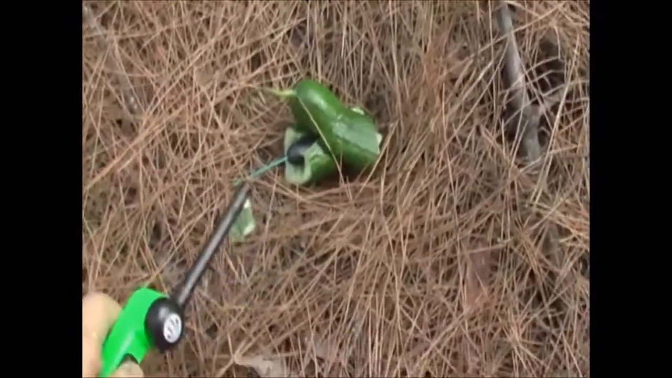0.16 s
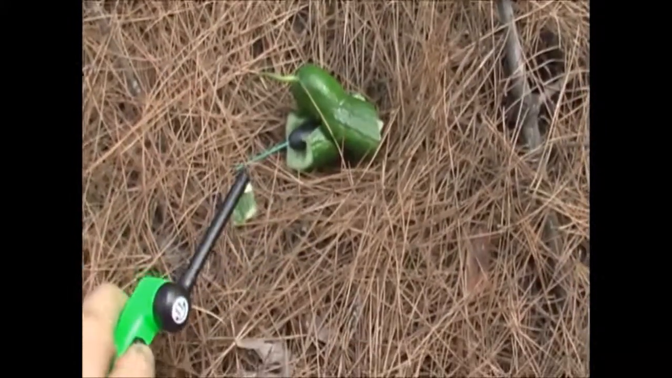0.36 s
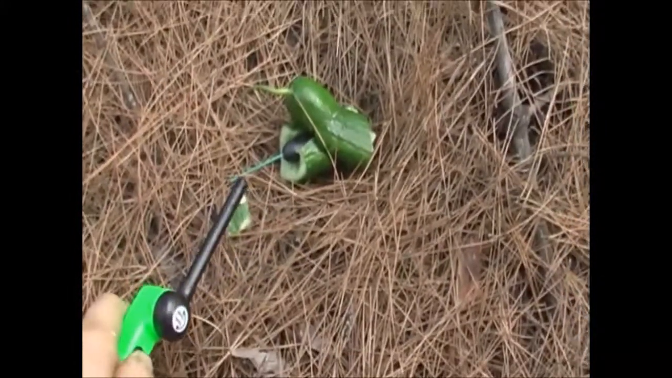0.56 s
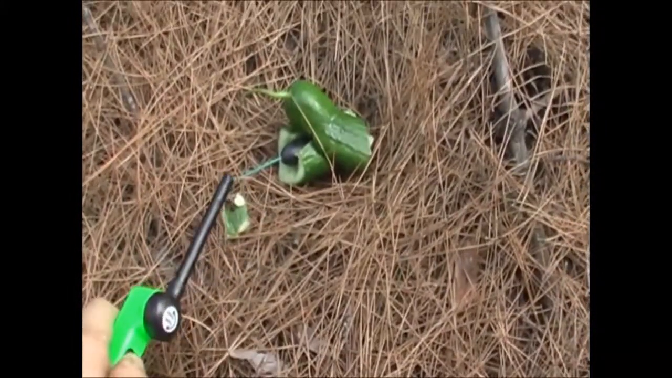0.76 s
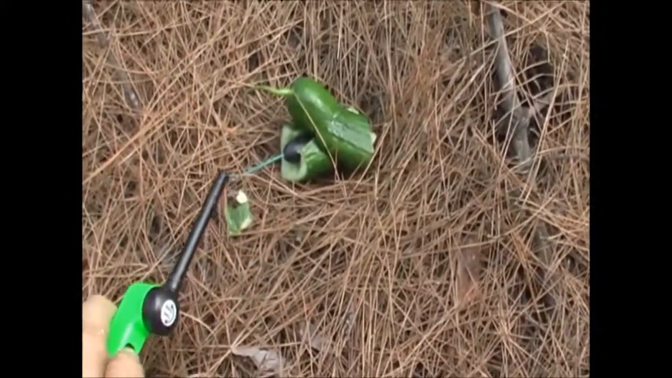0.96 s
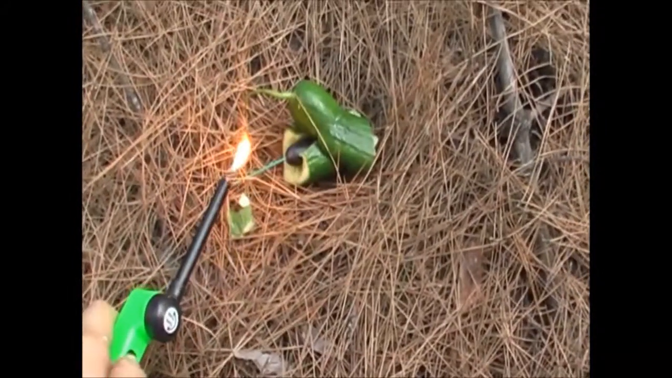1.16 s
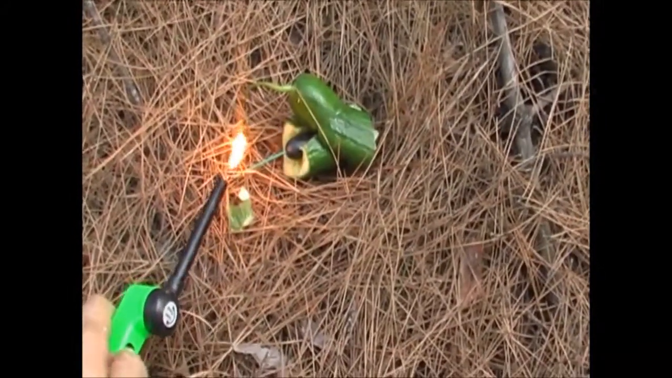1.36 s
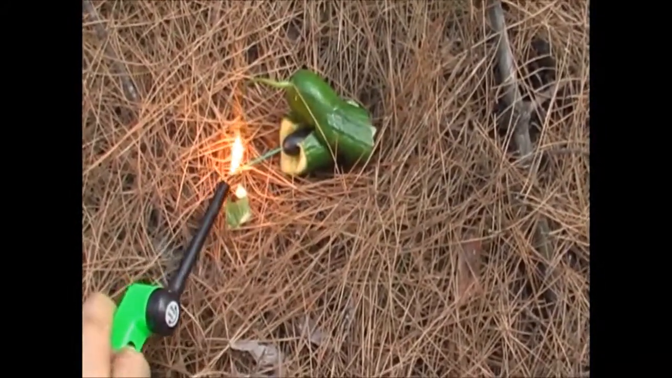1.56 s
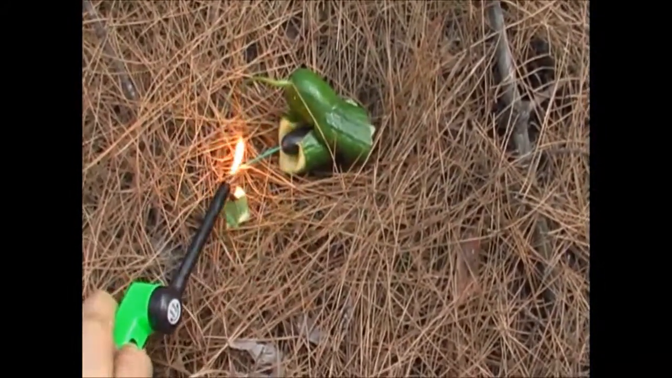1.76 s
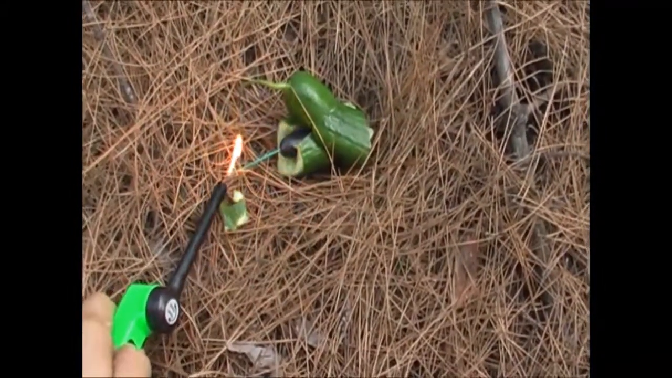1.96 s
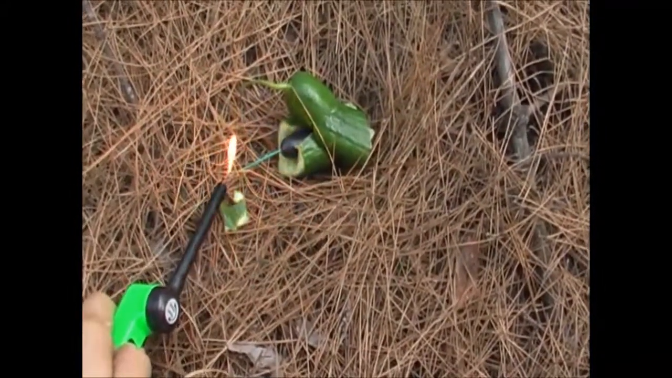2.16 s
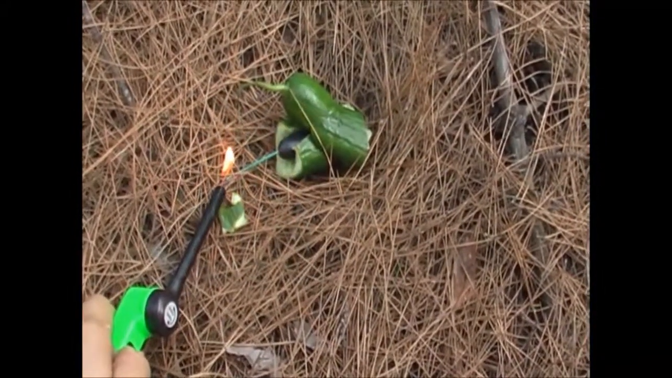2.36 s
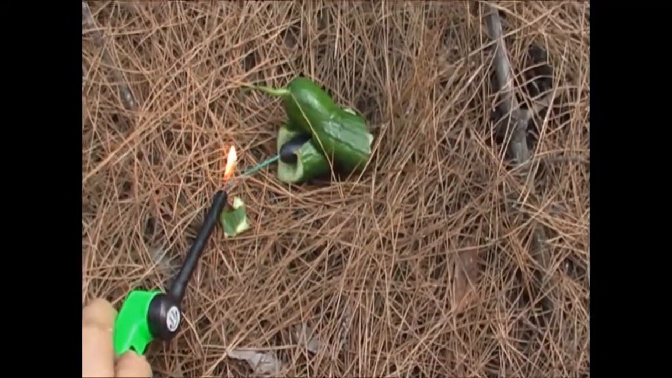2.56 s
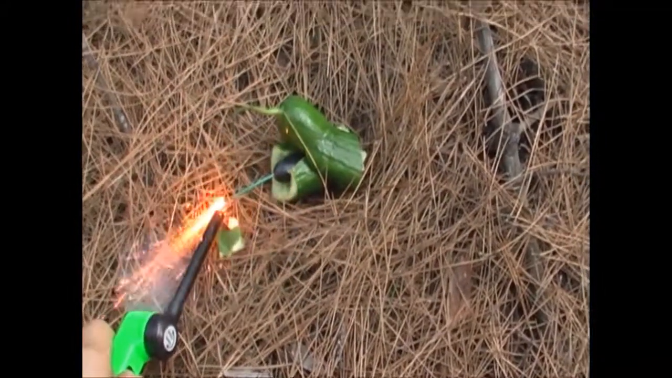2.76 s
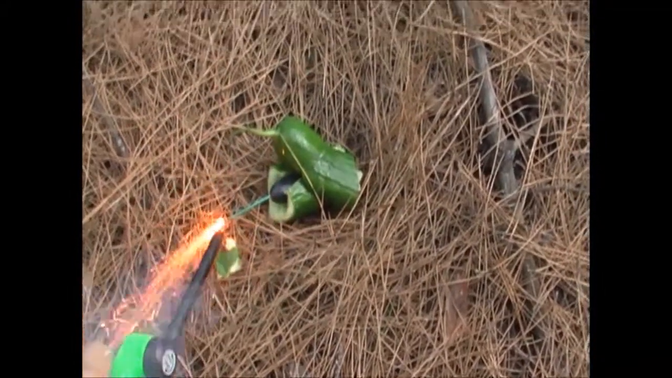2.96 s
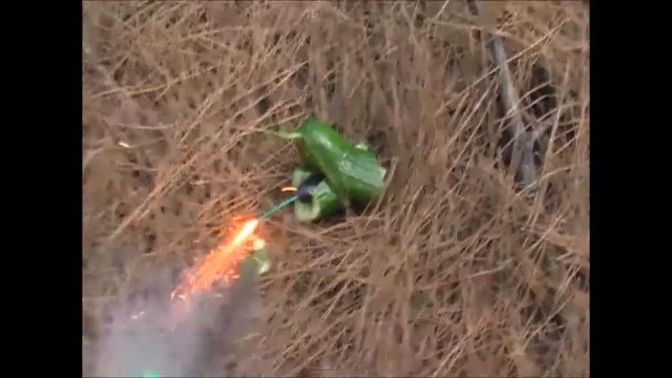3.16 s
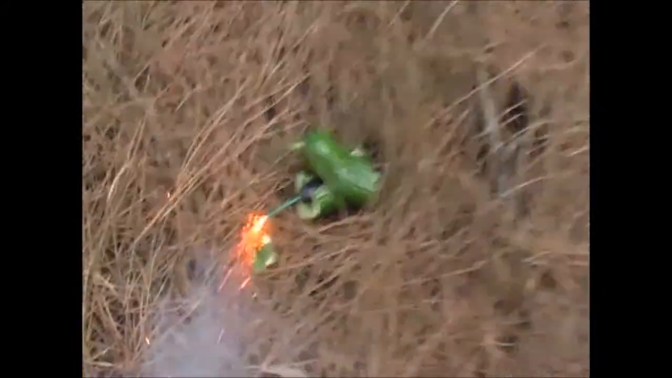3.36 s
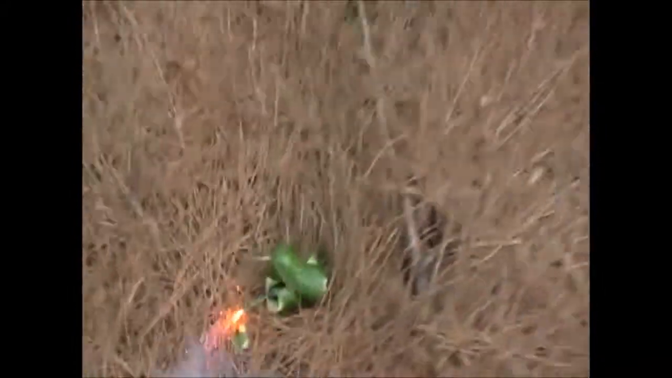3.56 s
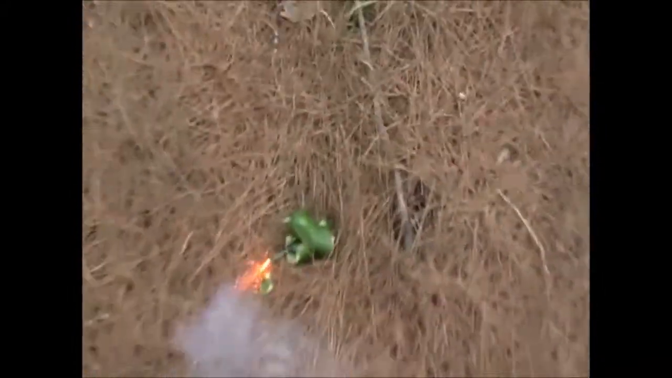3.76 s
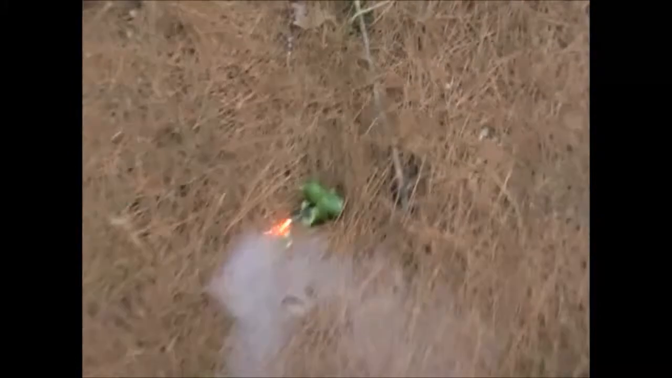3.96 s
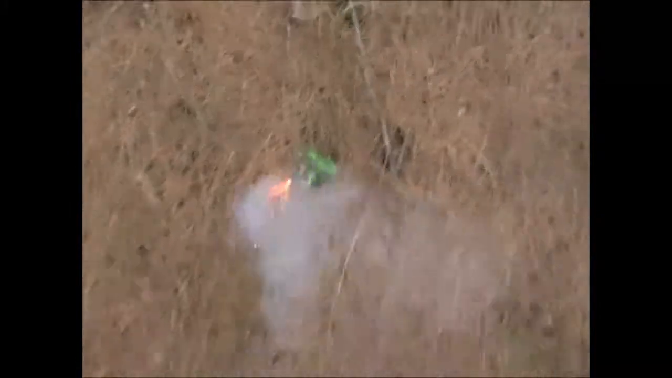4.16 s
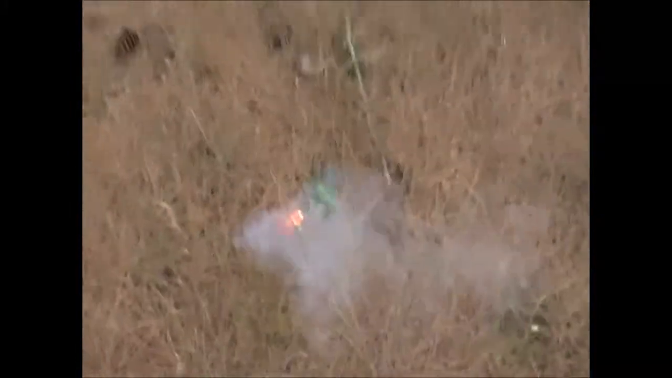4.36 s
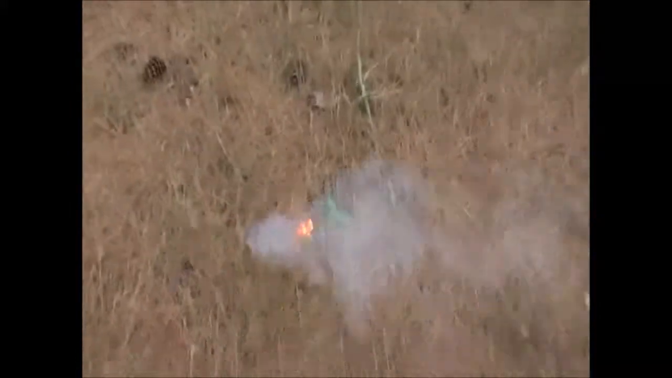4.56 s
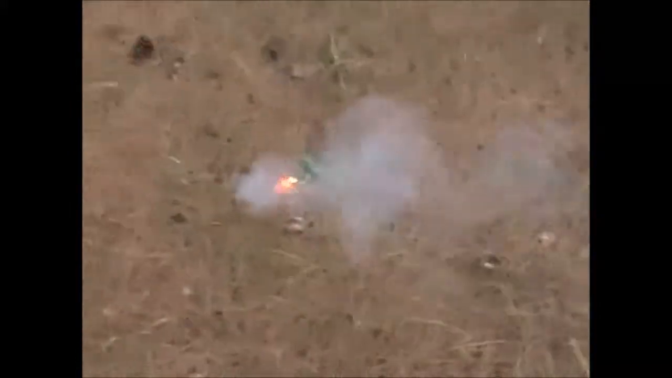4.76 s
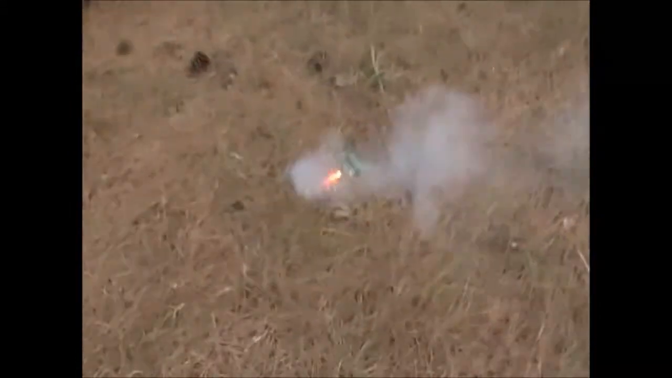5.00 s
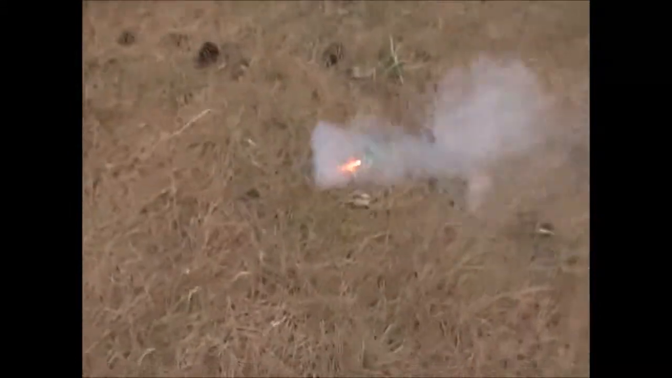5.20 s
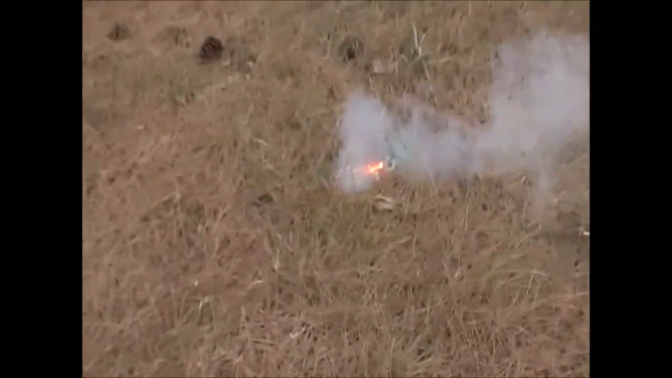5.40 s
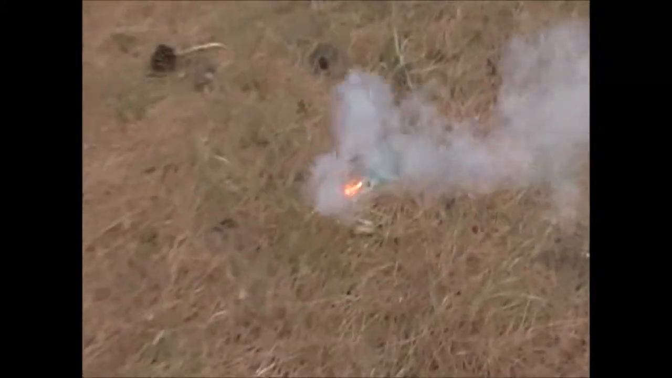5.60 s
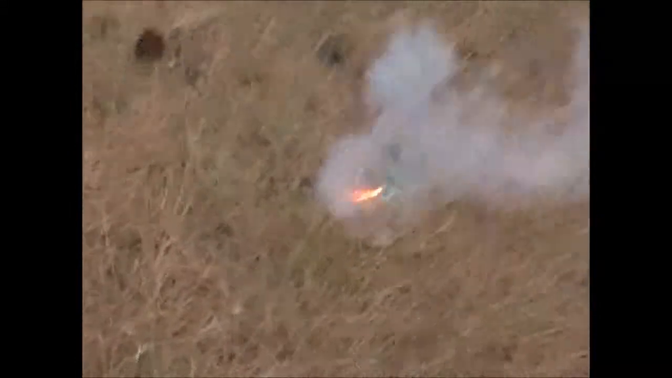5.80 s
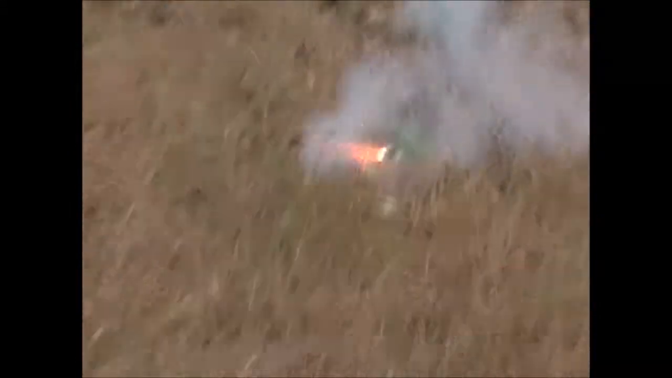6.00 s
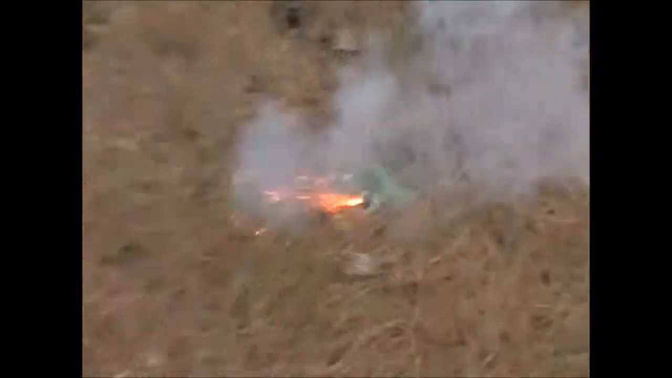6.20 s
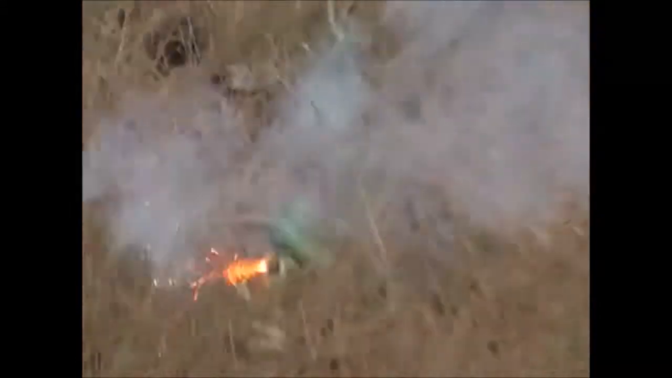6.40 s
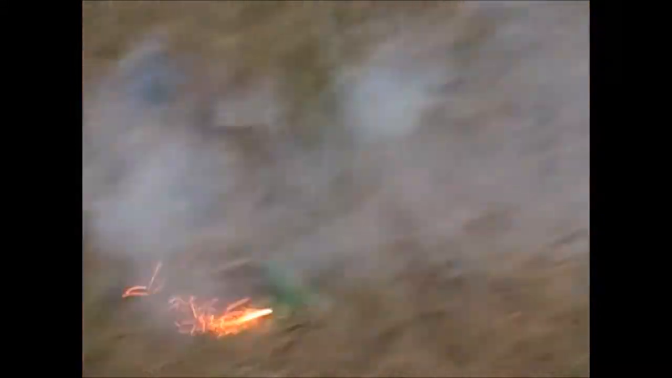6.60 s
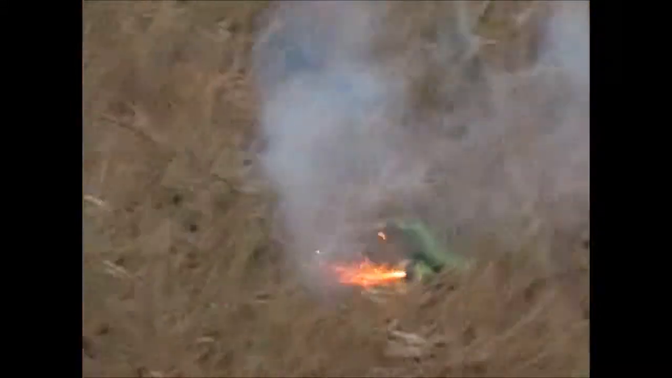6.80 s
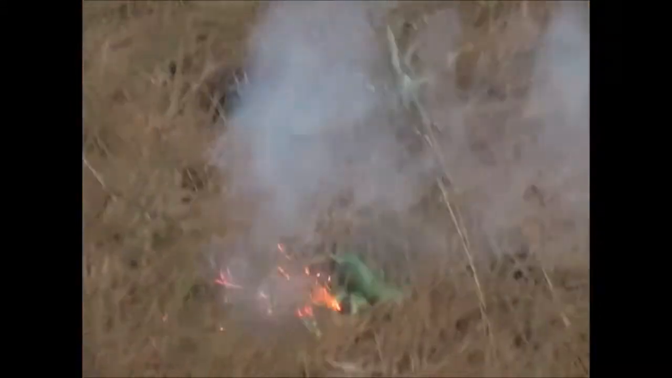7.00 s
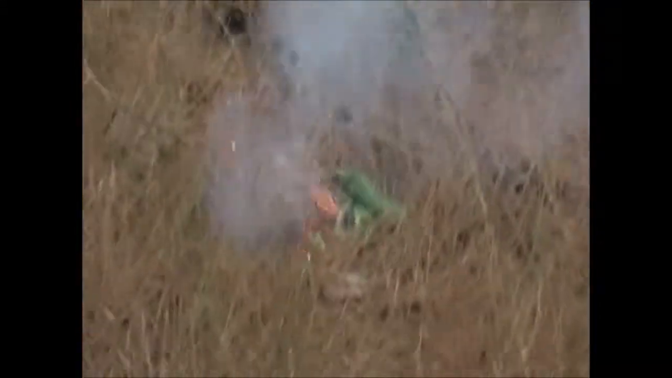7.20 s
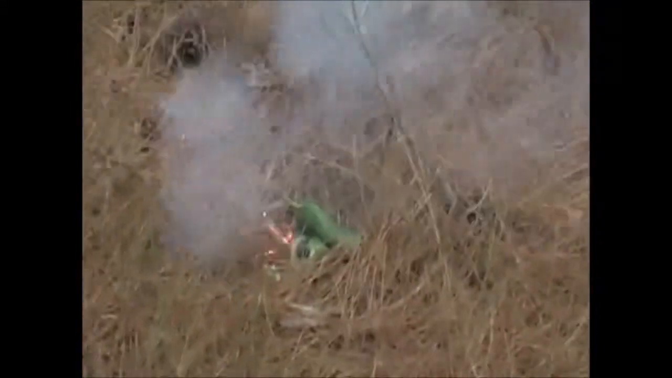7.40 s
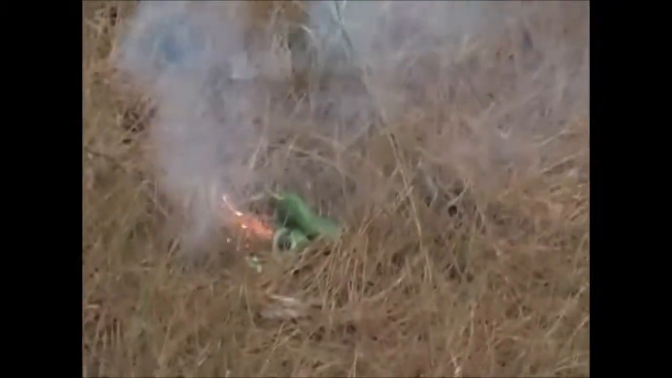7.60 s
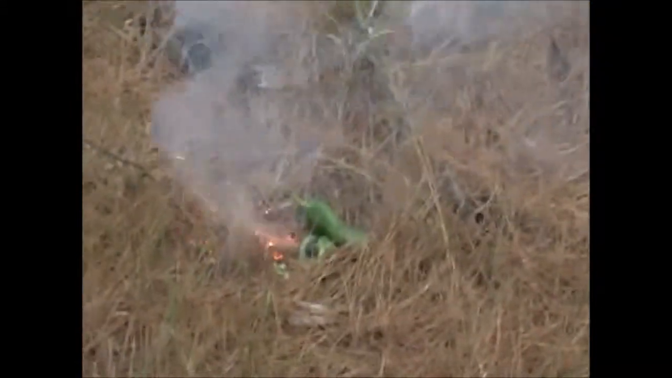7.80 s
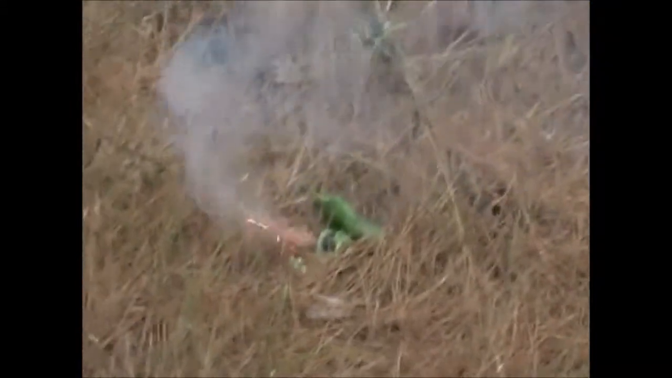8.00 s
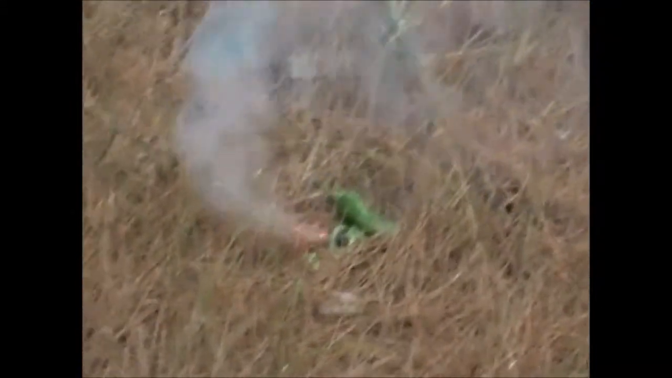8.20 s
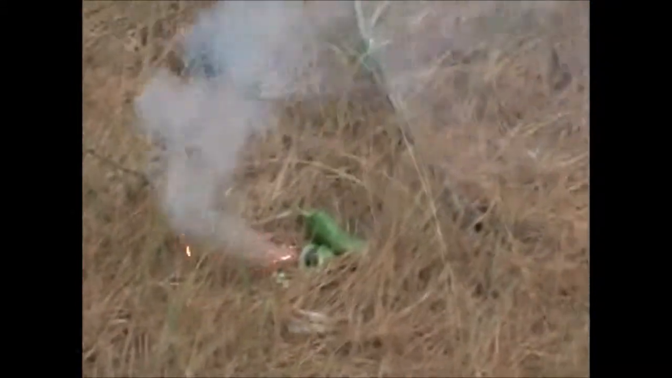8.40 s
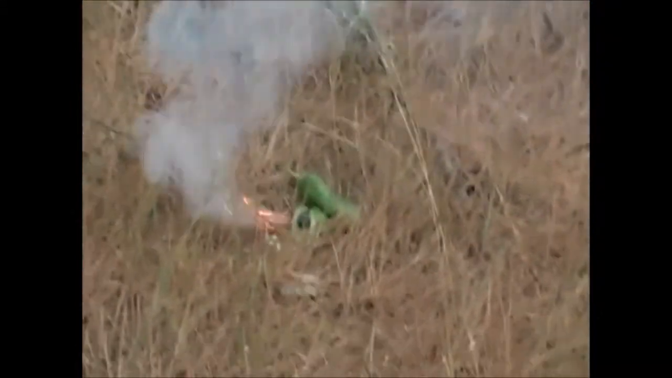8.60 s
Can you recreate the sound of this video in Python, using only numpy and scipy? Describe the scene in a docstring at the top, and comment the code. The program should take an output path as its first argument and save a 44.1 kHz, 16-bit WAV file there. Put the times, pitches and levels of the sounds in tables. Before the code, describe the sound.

Sharp plastic lighter clicks outdoors, a fuse catching with a fierce close hiss, crunching steps backing off, and a thin fizz inside the tube.

```python
"""Outdoors on dry pine needles: a long-necked lighter is snapped three times to light a firecracker's fuse.
The fuse flares into a hissing, sputtering jet, made of shaped noise and sparse clicks, heard from near by.
The listener backs away with crunching steps and cracking twigs, made of short, dying noise bursts.
The flame creeps into the tube and the jet turns to a hollow fizz over a low rumble, a hum and soft gusts."""
import sys
import numpy as np
from scipy import signal
from scipy.fft import rfft, irfft
from scipy.io import wavfile
from scipy.ndimage import uniform_filter1d

SR = 44100
rng = np.random.default_rng(int(sys.argv[2]) if len(sys.argv) > 2 else 0)


def inscribe(sig):
    """Save sig as 16-bit PCM at rate SR to the path in sys.argv[1].

    A 1-D sig is mono; a 2-D sig holds one channel per row.
    Samples are clipped to [-1, 1] before scaling.
    """
    pcm = np.round(np.clip(np.atleast_2d(sig).T, -1, 1) * 32767)
    wavfile.write(sys.argv[1], SR, pcm.astype(np.int16))


N = 381465  # length in samples
TIME = np.arange(N) / SR
BINS = np.fft.rfftfreq(1024, 1 / SR)  # frequencies of a spectrum, Hz
FRAMES = np.arange(N // 256 + 5) * 256 / SR  # times of the short spectra, s

# colour of a small tick of the lighter's parts: f/Hz, level/dB per Hz
TICK_COLOUR = [(100, -9), (600, -7), (1300, -1), (2300, -7), (3000, 0), (4400, -3.5), (5700, -13.5),
               (7400, -13), (9500, -16), (11000, -21.5), (14000, -23.5), (16000, -30.5)]

# the fuse catches and flares up
CATCH_S, FLARE_S = 2.792, 0.075
# the listener starts to back away from the fuse
BACK_OFF_S = 3.12
# the flame nears the tube's mouth, then slips inside
AT_MOUTH_S, INSIDE_S, SLIP_IN_S = 6, 7.13, 0.04


def fuse(flutter_db=0.74, patchy_db=1.3, roar_flutter_db=1.08, sparks_db=-13, tube_sparks_db=5):
    """A turbulent jet of burning powder makes rough noise, with sparks popping in it."""
    # colour of the jet close by, a few steps away and inside the tube: f/Hz, level/dB per Hz
    jet_near = [(50, -16), (220, -3.5), (500, -11), (850, 0), (1700, -0.5), (2350, -10), (2850, -1.5),
                (6000, -9.5), (7400, -4.5), (9300, -12), (10600, -2.5), (11800, -9), (13200, 1.5),
                (15000, -10)]
    jet_far = [(50, -23), (220, -9), (500, -8), (1000, 0), (1650, -1), (2100, -6.5), (3100, 0), (4400, 1.5),
               (5800, -2.5), (7900, 3), (9600, -4), (11300, -0.5), (13500, 1), (15500, 0.5)]
    jet_tube = [(50, -39), (300, 17), (700, -29), (1200, -14), (1600, 7), (2200, -2), (3200, 12),
                (4400, -2), (5900, -18), (7300, -17), (8400, -5), (9500, -6), (10800, -1), (15500, -25)]
    # how the tube's mouth colours the jet at full strength: f/Hz, width/Hz, level/dB
    tube_peaks = [(1200, 190, -29), (4170, 220, 19), (4300, 160, -5), (4880, 410, 23.5), (7260, 300, 22),
                  (8450, 240, 9)]
    # how alike left and right are: f/Hz, correlation
    jet_likeness = [(100, 0.98), (600, 1), (1400, 0.98), (2200, 1), (3500, 0.91), (5500, 0.92),
                    (7500, 0.95), (10500, 1), (13000, 0.87), (15500, 0.92)]

    # blend the three colours
    stage = jet_stage(FRAMES)[:, None]
    colours = enumerate((jet_near, jet_far, jet_tube))
    jet = sum(np.maximum(1 - abs(stage - k), 0) * unit(colour) for k, colour in colours)
    jet = jet + np.maximum(stage - 1, 0) * bumps(tube_peaks, BINS)

    # as the vent changes shape the jet leans towards a roar or a thin sizzle
    roar_db, hiss_db, sizzle_db = burn(FRAMES[:, None])
    roar_band, hiss_band, sizzle_band = (600, 1800), (2700, 9000), (11000, 15500)  # Hz
    jet = jet - band_db(jet, hiss_band)
    low = read([(1500, 1), (3200, 0)], BINS)
    high = read([(8000, 0), (12000, 1)], BINS)
    roar_lift = roar_db - hiss_db - band_db(jet, roar_band)
    sizzle_lift = sizzle_db - hiss_db - band_db(jet, sizzle_band)
    jet = jet + low * roar_lift + high * sizzle_lift
    # a small jet radiates little of the deepest bass
    jet = jet + read([(60, -7), (200, 2), (500, 3.5), (1200, -3.0), (3000, -0.5)], BINS)

    # uneven powder makes the whole jet flutter, eddies colour it in patches
    jet = jet + flutter_db * lumps(size=(4, 513)) + patchy_db * lumps(size=(9, 22))
    # the fresh flare is steadier, later the roar comes in puffs
    sputter = np.clip(0.74 + stage, 0, 1.35)
    jet = jet + roar_flutter_db * low * sputter * lumps(size=(7, 60))

    # sparks stand out more once the flame is inside
    sparks_gain = gain_of(sparks_db + tube_sparks_db * ramp(TIME, INSIDE_S, SLIP_IN_S))
    sparks = sparks_gain * grains(200, 2.5, unit(jet_far) - 12 * low)

    level = ramp(TIME, CATCH_S, FLARE_S) * gain_of(np.interp(TIME, FRAMES, hiss_db[:, 0]))
    lean_left = gain_of([[0.15], [-0.15]])
    out = (noise(jet, read(jet_likeness, BINS)) + sparks) * level * lean_left
    add(out, 2.809, blow(read(jet_near, BINS), 0.03, -44))  # a small pop as the fuse catches
    return out


def burn(t, cold_db=-2.5):
    """Levels of roar, hiss and sizzle in dB: distance and the tube change them, spurts ride on top."""
    # one row for each part of the jet: starting level close by/dB, loss on the way into the mouth/dB,
    # loss on slipping inside/dB, fade inside/dB per s (a negative loss or fade is a rise)
    roar_row = (-37, 3.5, 14.5, -3.8)
    hiss_row = (-32.5, 1, 5.5, 5.5)
    sizzle_row = (-34.5, 11.5, -3.5, 18)
    # uneven powder makes the jet spurt or falter:
    # middle t/s, length/s, extra roar/dB, extra hiss/dB, extra sizzle/dB
    spurt_rows = [(2.957, 0.11, 2, 0.5, -0.5), (3.423, 0.13, 0, 2, 5.5), (4.07, 0.36, -1.5, 2.5, 3),
                  (4.662, 0.14, 0, 1.5, 4), (4.827, 0.071, 2, 4, 0.5), (7.007, 0.25, -2, 2, 8),
                  (7.207, 0.033, 2, 4.5, 1), (7.267, 0.06, -5, -6, -5), (7.693, 0.31, 3.5, 5.5, 7)]
    near_m, walk_m_per_s, walk_s = 0.4, 0.6, 2.48

    distance = near_m + walk_m_per_s * np.clip(t - BACK_OFF_S, 0, walk_s)
    distance_loss_db = 20 * np.log10(distance / near_m)
    nearing = ramp(t, AT_MOUTH_S, INSIDE_S - AT_MOUTH_S)
    inside = ramp(t, INSIDE_S, SLIP_IN_S)
    inside_s = np.maximum(t - INSIDE_S, 0)
    levels = []
    for db, mouth_db, inside_db, fade in (roar_row, hiss_row, sizzle_row):
        levels.append(db - distance_loss_db - mouth_db * nearing - inside_db * inside - fade * inside_s)
    for middle, length, *extras in spurt_rows:
        shape = spurt(t, middle, length)
        levels = [db + extra_db * shape for db, extra_db in zip(levels, extras)]
    roar, hiss, sizzle = levels
    # the sizzle is the last to reach its strength
    return roar, hiss, sizzle + cold_db * (1 - ramp(t, CATCH_S + FLARE_S, 0.21))


def jet_stage(t):
    """Which colour the jet has: 0 close by, 1 a few steps away, above 1 a growing share of the tube's."""
    far_share, far_colour_s = 0.15, 1.5  # share at the start, s of walking until it is complete
    mouth_share, inside_share = 0.1, 0.32  # share of the tube's colour at the mouth and inside
    away = far_share + (1 - far_share) * ramp(t, BACK_OFF_S, far_colour_s)
    at_mouth = mouth_share * ramp(t, BACK_OFF_S, AT_MOUTH_S - BACK_OFF_S)
    return away + at_mouth + (inside_share - mouth_share) * ramp(t, INSIDE_S, SLIP_IN_S)


def scorch(level_db=-82):
    """The fuse's coating crackles faintly in the flame before it catches: sparse, bright clicks."""
    heating = (TIME > 1.2) & (TIME < 2.8)
    return gain_of(level_db) * heating * grains(13, 2.9, tilted(TICK_COLOUR, 8.0))


def lighter():
    """The trigger slides and snaps, small parts tick and the hand rubs the handle."""
    return snaps() + ticks() + trigger_slide() + hand_rub()


def snaps(contact=0.0013, neck_reach_db=7):
    """The trigger's spring lets go, rattles the plastic handle and rings the metal neck."""
    # one row a snap: t/s, level over 10 ms/dB, decay setting/s, handle rattle/dB, neck ring/dB,
    # f where the neck rings most/Hz, stereo width (0-1)
    snap_rows = [(0.73, -15.5, 0.013, -32, -53, 4450, 0.38), (0.9528, -25.5, 0.015, -40.5, -71, 3800, 0.32),
                 (1.126, -16.5, 0.0099, -29, -51, 5240, 0.5)]
    # colour of each snap in turn: f/Hz, level/dB per Hz
    misfire = [(40, -5), (200, -4.5), (1400, -11), (2300, -5.5), (4300, 1.5), (5500, -15), (6400, -12.5),
               (7400, -3), (9000, -9.5), (9800, -26.5), (11000, -7), (12500, -13), (14000, -3.5),
               (16200, -36)]
    release = [(40, -25), (400, -21.5), (1400, 1.5), (2000, 0), (4200, -1.5), (5100, -15), (6200, -3.5),
               (7100, 1), (9300, -12), (11000, -4.5), (12400, 0), (14000, -0.5), (15000, -5.5),
               (16200, -24)]
    ignition = [(40, -17), (250, -12.5), (900, -26.5), (1700, -9.5), (2300, -4), (3100, 0.5), (4500, -10),
                (5600, -17), (7500, -4), (9600, -20), (10900, -6), (12600, -26.5), (14100, -2.5),
                (16200, -36)]
    # ringing modes of the handle: f/Hz, level/dB, time to fall 60 dB/s
    handle_modes = [(2010, -2.5, .06), (2280, 1.5, .07), (2750, -3.5, 0.03), (3200, -4.5, .055),
                    (4150, 7.5, 0.025), (7400, -12.5, 0.036), (14300, -13.5, .05)]
    # ringing modes of the neck: f/Hz, level/dB, time to fall 60 dB/s
    neck_modes = [(4270, 0.9, 0.39), (5130, 0.088, 0.23), (6100, 0.93, .21)]

    out = np.zeros((2, N))
    for row, colour in zip(snap_rows, (misfire, release, ignition)):
        s, db, t60, handle_db, neck_db, neck_hz, side = row
        add(out, s, blow(read(colour, BINS), t60, db, side, contact))
        chatter = rattle(handle_modes) + side * rattle(handle_modes) * np.array([[1], [-1]])
        # modes far from the favoured pitch ring less
        modes = [(hz, mode_db - neck_reach_db * abs(hz - neck_hz) / 1000, decay)
                 for hz, mode_db, decay in neck_modes]
        add(out, s, gain_of(handle_db) * chatter + gain_of(neck_db) * ring(modes))
    return out


def ticks(side=0.37, t60=0.026, own_colour_db=3):
    """Small parts of the trigger and the hot nozzle tick, each a short burst of its own colour."""
    # t/s, level over 10 ms before panning/dB, tilt/dB per octave, left minus right/dB
    tick_rows = [(0.0783, -55.5, -3, 2), (0.485, -43.5, -0.5, 2.5), (0.5666, -44.5, -8.5, 0),
                 (0.6158, -44.5, 1, 1.5), (0.6524, -51, 1, 4), (.663, -49.5, 3, -2.5), (0.6932, -42, 1, 2),
                 (0.9203, -52, 0, -0.5), (.946, -36.5, 1.5, 0), (0.9498, -41, 2.5, 0),
                 (1.033, -54.5, 3, 2.5), (1.0541, -43, -0.5, 4), (1.0796, -48.5, -0.5, 0),
                 (1.114, -43, 2.5, 0), (1.1438, -40.5, 0.5, -1), (1.2262, -58.5, 12, 2),
                 (1.583, -35.5, 17, 6), (2.339, -51.5, 3, 0), (2.699, -55, -8.5, 6.5)]
    out = np.zeros((2, N))
    for s, db, tilt, pan_db in tick_rows:
        own_colour = own_colour_db * lumps(size=(1, 14))[0]  # each part has resonances of its own
        pan = gain_of([[pan_db / 2], [-pan_db / 2]])
        add(out, s, blow(tilted(TICK_COLOUR, tilt) + own_colour, t60, db, side) * pan)
    return out


def trigger_slide():
    """The squeezed trigger slides towards the first and last snap: noise that swells and stops short."""
    # end t/s, length/s, level reached at the end/dB
    squeezes = [(0.737, .04, -40), (1.129, 0.029, -38)]
    # f/Hz, level/dB per Hz
    slide_colour = [(100, -19), (900, -0.5), (1900, 1), (3200, -8.5), (5000, -25.5), (16000, -30.5)]
    slide = noise(unit(slide_colour)[None], 0.79)
    gain = sum(gain_of(db) * np.clip(1 + (TIME - s) / length, 0, 1) * (TIME < s) for s, length, db in squeezes)
    return slide * gain


def hand_rub():
    """Skin rubs and catches on the lighter's handle: soft noise with small clicks."""
    # colour of the rubbing: f/Hz, level/dB per Hz
    grip_colour = [(1180, -41.5), (2000, -12), (2530, -12), (3140, -3.5), (5580, -12), (8190, -12),
                   (9580, -17), (12400, -10.5), (16000, -14.5)]
    # shifts of the grip: middle t/s, length/s, level/dB
    rub_rows = [(.02, 0.13, -63), (.3, 0.18, -57.5), (.52, 0.1, -61.5), (.68, 0.12, -58),
                (1.14, 0.095, -63.5)]
    rub = noise(unit(grip_colour) + 1.6 * lumps(size=(2, 200)), 0.3)
    rub = rub + 0.27 * grains(250, 4.9, unit(grip_colour))
    resting = gain_of(-75) * (TIME < 3.2)  # until the lighter is taken away
    return rub * (strokes(rub_rows) + resting)


def footsteps(crack_side=0.38, thump_db=6, thump_width=0.5, clothes_db=-61):
    """Soles thud and scuff on the mat of needles, clothes rustle and dry twigs crack."""
    # footfalls: t/s, level over 10 ms/dB, tilt/dB per octave, decay setting/s, thump f/Hz,
    # stereo width (0-1)
    step_rows = [(4.07, -33, 1, 0.029, 450, 0), (4.08, -32.5, -4, .03, 400, 0),
                 (4.1154, -29.5, -4.5, .02, 457, 0), (4.7954, -40.5, -1, 0.06, 450, 0),
                 (4.839, -48, -15, .06, 230, .15), (6.023, -44.5, 0, 0.026, 480, .15),
                 (6.044, -42, -3, 0.028, 900, 0), (6.096, -38, -7, 0.028, 250, .15),
                 (6.661, -31.5, -1.5, 0.042, 380, 0.57)]
    # colour of a footfall: f/Hz, level/dB per Hz
    thud_colour = [(40, -60), (130, -10.5), (300, 4.5), (520, 7), (900, 1), (1500, 5), (2300, -8),
                   (3500, -1.5), (9000, -7.5), (15000, -28)]
    # twigs and needles crack: t/s, level over 10 ms/dB, centre f/Hz, width/octaves
    crack_rows = [(3.1828, -28.5, 8000, 1), (3.79, -27, 5960, 0.72), (3.971, -32.5, 4670, 0.37),
                  (4.0245, -34, 4500, 0.48), (4.037, -30, 5700, 0.94), (4.079, -34.5, 4500, 1),
                  (4.1124, -29.5, 9300, 0.14), (4.2205, -42, 5000, 0.72), (6.105, -46, 6000, 1),
                  (6.6612, -42, 3500, 0.67), (6.7118, -45, 3500, 0.59), (7.087, -53, 6000, 1),
                  (7.297, -60, 6000, 1)]
    # colour of scuffs and clothes: f/Hz, level/dB per Hz
    sole_colour = [(60, -27), (200, 2.5), (400, 3), (900, 2), (1500, -3.5), (2300, -7), (6000, -36.5)]
    # soles scuff through the needles: middle t/s, length/s, level/dB
    scuff_rows = [(4.03, 0.18, -44), (4.87, 0.15, -49.5), (5.17, 0.059, -48.5), (5.48, .06, -50),
                  (5.83, 0.08, -61), (6.03, 0.2, -49), (6.63, 0.15, -46.5)]

    rustle = noise(unit(sole_colour) + 3.05 * lumps(size=(4, 16)), 0.83)
    clothes = gain_of(clothes_db) * ramp(TIME, BACK_OFF_S, 0.87)
    out = rustle * np.hypot(strokes(scuff_rows), clothes)
    for s, db, tilt, t60, hz, side in step_rows:
        thump = bumps([(hz, thump_width * hz, thump_db)], BINS)
        add(out, s, blow(tilted(thud_colour, tilt) + thump, t60, db, side))
    for s, db, hz, octaves in crack_rows:
        octaves_off = np.log2((BINS + 1) / hz)
        colour = -20 * np.log10(1 + (octaves_off / octaves) ** 2 / 2)
        add(out, s, blow(colour, 0.0077, db, crack_side))
    return out


def surroundings(x, t60=0.43, wet_db=-33):
    """Ground and trees scatter a faint, short echo: the sound is smeared by a dying noise tail."""
    t = np.arange(SR // 2) / SR
    tail = rng.standard_normal((2, len(t))) * gain_of(-60 * t / t60) * (t > 0.006)
    return gain_of(wet_db) * signal.fftconvolve(x, tail / np.linalg.norm(tail[0]), axes=1)[:, :N]


def air():
    """Far-off sources blur into a low rumble and a hum with a faint hiss; gusts buffet the microphones."""
    # how alike left and right are: f/Hz, correlation
    air_likeness = [(40, 1), (120, 1), (280, 0.76), (650, 0.075), (1400, .1), (3000, 0.31), (7000, .5),
                    (12000, 0.3)]
    return rumble(air_likeness) + far_hum(air_likeness) + gusts()


def rumble(likeness):
    """Distant outdoor sound, mostly low because its treble is weak: slowly drifting noise."""
    # f/Hz, level/dB per Hz
    air_colour = [(20, -25.5), (45, -13.5), (80, 0), (150, -6), (220, -5), (400, -6), (900, -12),
                  (1600, -17), (2400, -32), (4100, -28.5), (5800, -38), (9600, -39), (11200, -36),
                  (15500, -43)]
    drift = 1.2 * lumps(size=(20, 6))
    return gain_of(-56.5) * noise(unit(air_colour) + drift, read(likeness, BINS))


def far_hum(likeness, lift_db=0.6, fade_db_per_s=3):
    """Narrow bands of noise waver like a far-off hum, which fades from the moment of backing away."""
    # f/Hz, width/Hz, level before the lift and fade/dB
    hum_bands = [(83, 26, -65), (142.6, 17, -65), (885.5, 64, -67.5)]
    hz, hum = np.fft.rfftfreq(2 ** 19, 1 / SR), 0
    for centre, width, db in hum_bands:
        z = rfft(rng.standard_normal((2, 2 * len(hz) - 2)))
        shared = z + 0.6 * read(likeness, centre) * z[::-1]  # each side leaks into the other
        pair = irfft(shared * bumps([(centre, width, 1)], hz))[:, :N]
        hum = hum + gain_of(db) * evened(pair)
    return hum * gain_of(lift_db - fade_db_per_s * np.maximum(TIME - BACK_OFF_S, 0))


def gusts(breeze_db=-71):
    """Air buffets the moving microphones: bass noise that mostly pushes left and right opposite ways."""
    # f/Hz, level/dB per Hz
    gust_colour = [(20, -24), (45, -2), (70, 0.5), (140, 3), (260, -8), (600, -29), (3000, -59.5)]
    # middle t/s, length/s, level/dB
    buffet_rows = [(4.63, .13, -58), (5.47, 0.1, -48)]
    wind = noise(unit(gust_colour) + 2.1 * lumps(size=(14, 8)), -0.72)
    breeze = gain_of(breeze_db) * ramp(TIME, BACK_OFF_S, 1)
    return wind * (strokes(buffet_rows) + breeze)


def blow(colour_db, t60, level_db, side=0.12, contact=0.0002):
    """A burst of tiny contacts that lasts a moment, then dies away in a body of the given colour."""
    after = np.maximum(np.arange(4096) / SR - contact, 0)
    burst = rng.choice([-1., 1.], (2, len(after))) * gain_of(-60 * after / t60)
    for _ in range(2):  # flatten the burst's own colour, then restore some of its decay
        z = rfft(burst)
        burst = irfft(z / (abs(z) + 1e-12)) * gain_of(-20 * after / t60)
    mid, wide = (evened(signal.fftconvolve(b, causal(colour_db))) for b in burst)
    pair = np.array([mid + side * wide, mid - side * wide])
    # the level counts the burst's whole energy as if spread over 10 ms
    return gain_of(level_db) * evened(pair) * np.sqrt(SR / 100 / len(mid))


def rattle(modes, width_hz=260):
    """Loose parts chatter, so each mode rings as a rough band instead of a clean tone."""
    t = np.arange(SR // 2) / SR
    hz = np.fft.rfftfreq(2 * len(t), 1 / SR)
    out = 0
    for centre, db, t60 in modes:
        width = width_hz * np.sqrt(centre / 1000)  # higher bands are wider
        band = irfft(rfft(rng.standard_normal(2 * len(t))) * bumps([(centre, width, 1)], hz))
        out = out + evened(band)[:len(t)] * gain_of(db - 60 * t / t60)
    return out / np.sqrt(2)


def ring(modes):
    """A struck part swings at its own pitches: dying sines."""
    t = np.arange(SR // 2) / SR
    return sum(gain_of(db - 60 * t / t60) * np.sin(2 * np.pi * hz * t) for hz, db, t60 in modes)


def grains(per_s, spread_db, colour_db):
    """Sparse clicks of uneven size, rms 1."""
    sizes = gain_of(spread_db * np.minimum(rng.exponential(1, N), 4)) * rng.choice([-1, 1], N)
    clicks = sizes * (rng.random(N) < per_s / SR)
    return evened(signal.oaconvolve(clicks, causal(colour_db))[:N])


def noise(field_db, likeness):
    """Stereo noise whose spectrum follows a dB field; a flat 0 dB gives rms 1."""
    hiss = rng.standard_normal((2, N + 2048))
    a, b = signal.stft(hiss, nperseg=1024, noverlap=768)[2][..., :len(FRAMES)]
    c = np.clip(likeness * np.ones(len(BINS)), -1, 1)[:, None]
    mid, side = a * np.sqrt((1 + c) / 2), b * np.sqrt((1 - c) / 2)
    z = np.array([mid + side, mid - side]) * gain_of(field_db).T
    return signal.istft(z, nperseg=1024, noverlap=768)[1][:, :N]


def lumps(size):
    """A random field over time and frequency, smooth over (frames, bins), rms 1."""
    z = rng.standard_normal((len(FRAMES), len(BINS)))
    return evened(uniform_filter1d(uniform_filter1d(z, size[0], 0), size[1], 1, mode="wrap"))


def causal(db):
    """The impulse response with this spectrum that acts as early as possible."""
    log_gain = np.log(gain_of(np.r_[db, db[-2:0:-1]]))
    return np.fft.ifft(np.exp(np.conj(signal.hilbert(log_gain)))).real


def read(points, hz):
    """A spectrum's value, joined on a log-frequency axis."""
    f, value = np.transpose(points)
    return np.interp(np.log(hz + 1), np.log(f + 1), value)


def tilted(points, db_per_octave):
    """A spectrum made brighter or duller."""
    return read(points, BINS) + db_per_octave * np.log2(np.maximum(BINS, 200))


def unit(points):
    """A spectrum over the bins, at a total level of 0 dB."""
    db = read(points, BINS)
    return db - band_db(db, (0, SR))


def band_db(field_db, band):
    """Level that a dB field holds within a band, frame by frame."""
    inside = (BINS >= band[0]) & (BINS <= band[1])
    return 10 * np.log10(np.mean(gain_of(field_db) ** 2 * inside, -1, keepdims=True))


def bumps(rows, hz):
    """Bell-shaped peaks and notches of the given height and width at half height."""
    return sum(db * swell(hz, centre, width) for centre, width, db in rows)


def swell(t, middle, length):
    """A smooth rise and fall that stays above half height for the given length."""
    return np.exp(-np.log(16) * ((t - middle) / length) ** 2)


def strokes(rows):
    """The gain of a series of soft strokes."""
    return sum(gain_of(db) * swell(TIME, middle, length) for middle, length, db in rows)


def spurt(t, middle, length):
    """A quick rise, a hold and a quick fall."""
    return np.exp(-np.log(2) * (2 * (t - middle) / length) ** 4)


def ramp(t, start, length):
    """Rises from 0 to 1 over the given time."""
    return np.clip((t - start) / length, 0, 1)


def gain_of(db):
    """Decibels to amplitude."""
    return 10 ** (np.asarray(db) / 20)


def evened(x):
    """Scales to rms 1."""
    return x / np.sqrt(np.mean(x ** 2) + 1e-20)


def add(mix, s, sound):
    """Mixes a sound in at s seconds."""
    part = mix[..., round(s * SR):][..., :sound.shape[-1]]
    part += sound[..., :part.shape[-1]]


def scene():
    """Fuse, lighter and steps in the open air."""
    near = fuse() + scorch() + lighter() + footsteps()
    return near + surroundings(near) + air()


def record(dry, low_cut_hz=38, high_cut_hz=15900):
    """The microphone sheds the deepest bass, its housing colours the sound, full scale caps the peaks."""
    # peaks and notches of the housing: f/Hz, width/Hz, level/dB
    housing = [(1710, 160, 2), (1820, 170, -3), (2174, 64, 4), (2400, 120, 0), (2600, 92, -4),
               (2790, 190, 2)]
    thinned = signal.sosfilt(signal.butter(2, low_cut_hz, "high", fs=SR, output="sos"), dry)
    coloured = signal.oaconvolve(thinned, causal(bumps(housing, BINS))[None], axes=1)[:, :N]
    capped = np.clip(coloured, -1, 1)
    # the top treble is cut off last
    low_pass = signal.firwin(401, high_cut_hz, window=("kaiser", 8), fs=SR)
    return signal.oaconvolve(capped, low_pass[None], "same")


dry = scene()
out = record(dry)
inscribe(out)
```